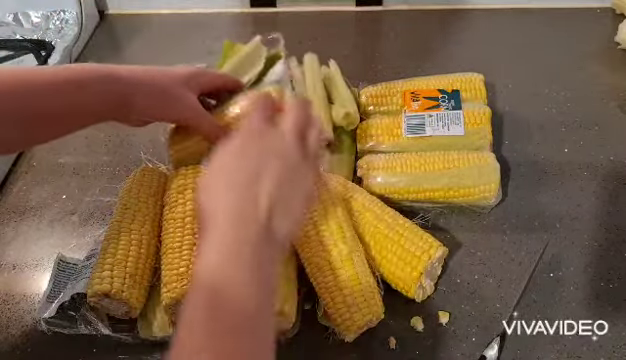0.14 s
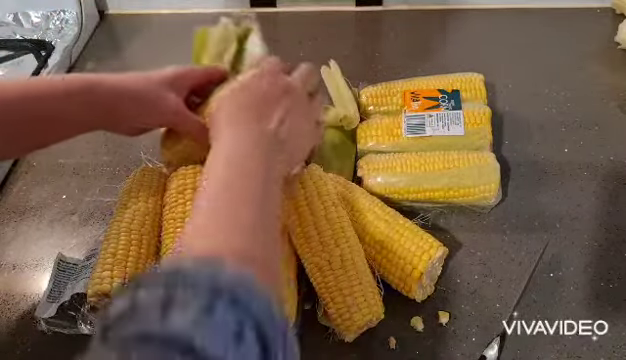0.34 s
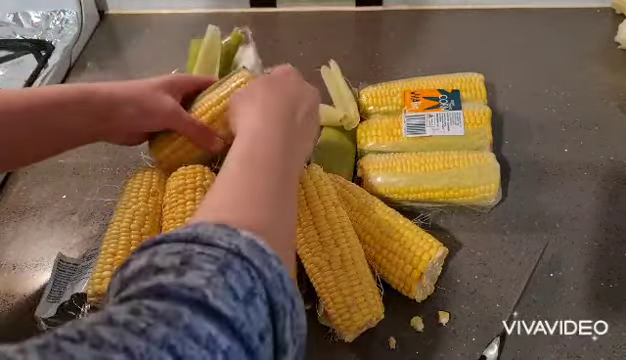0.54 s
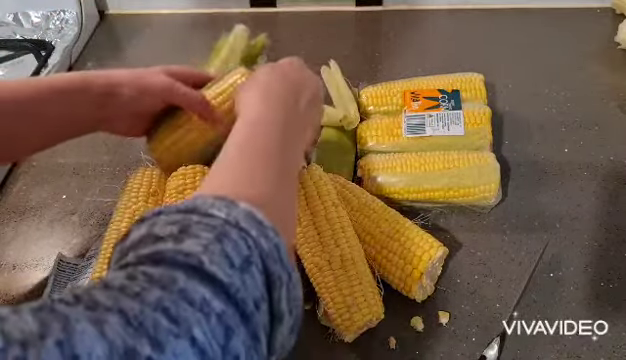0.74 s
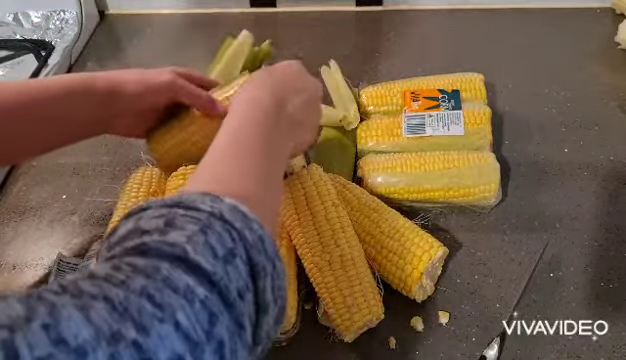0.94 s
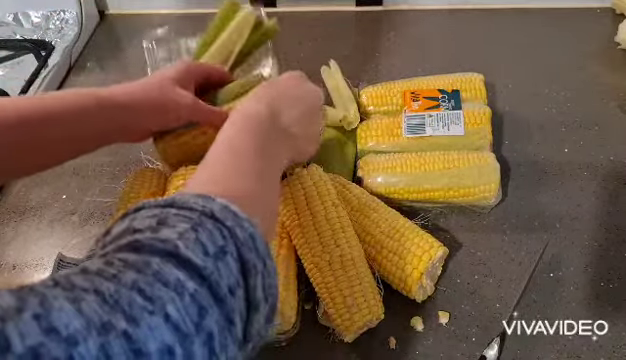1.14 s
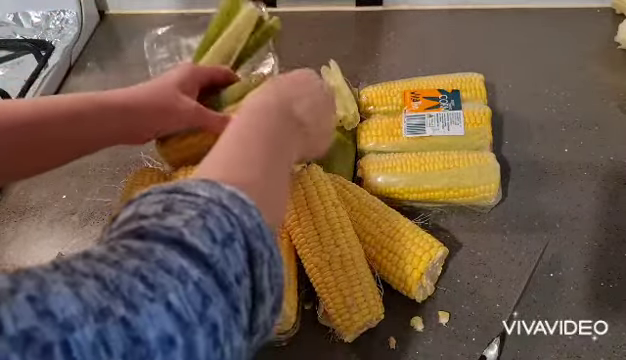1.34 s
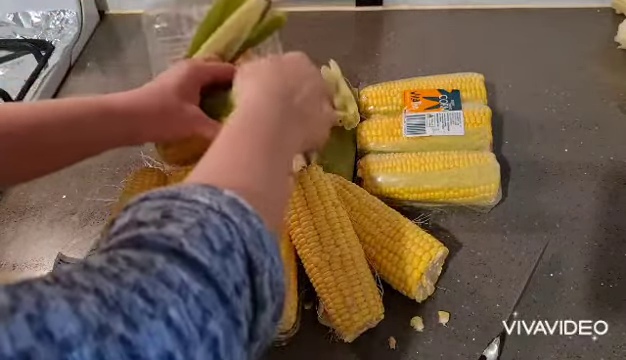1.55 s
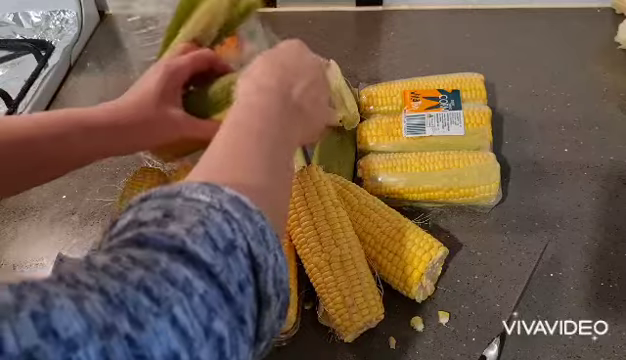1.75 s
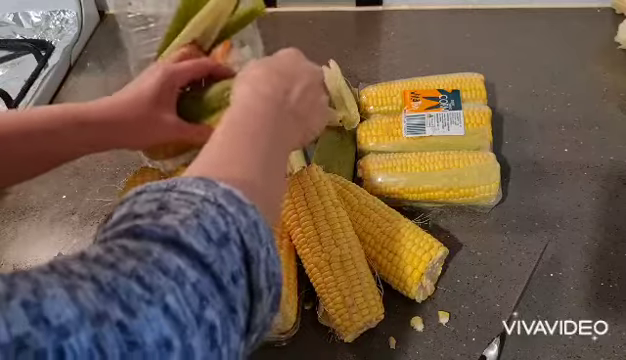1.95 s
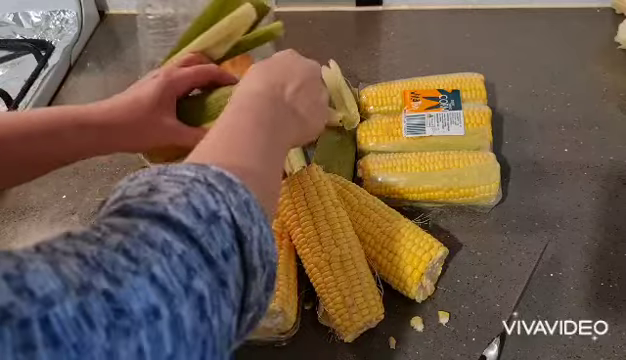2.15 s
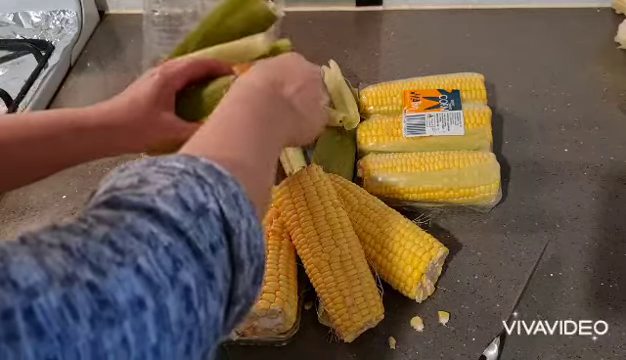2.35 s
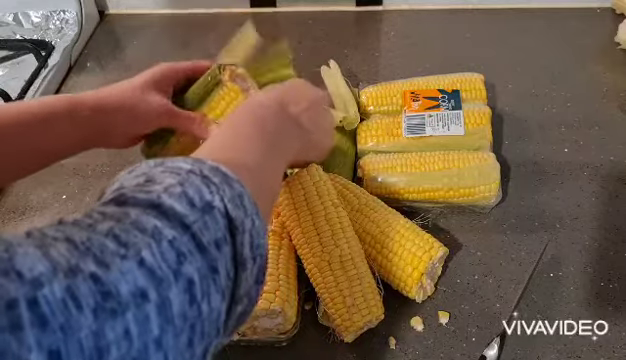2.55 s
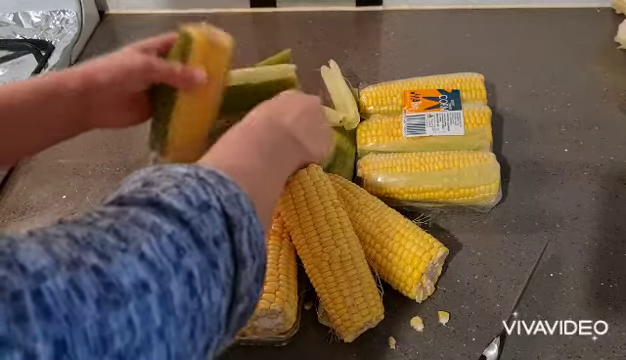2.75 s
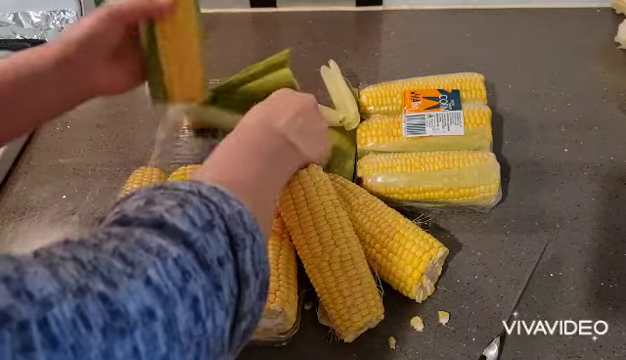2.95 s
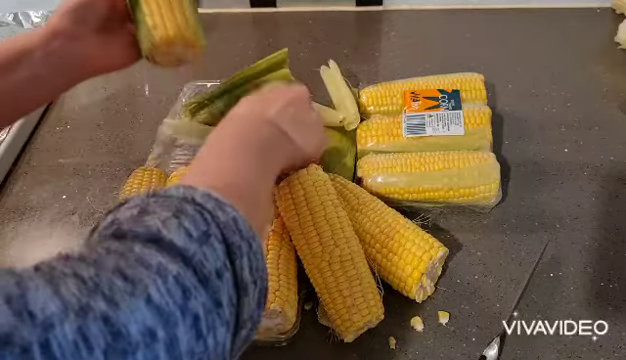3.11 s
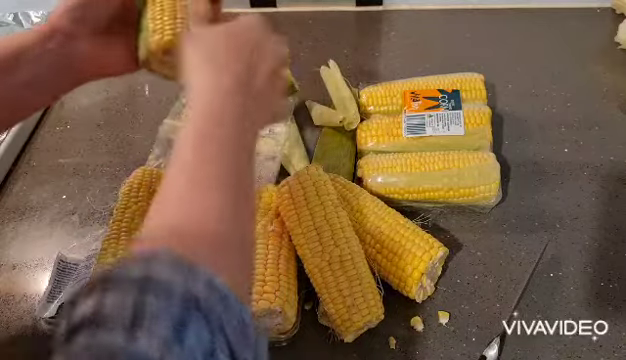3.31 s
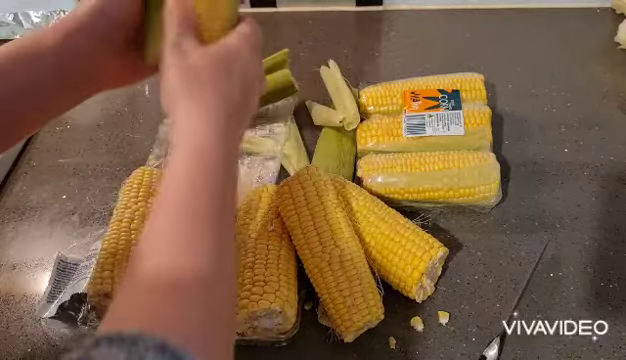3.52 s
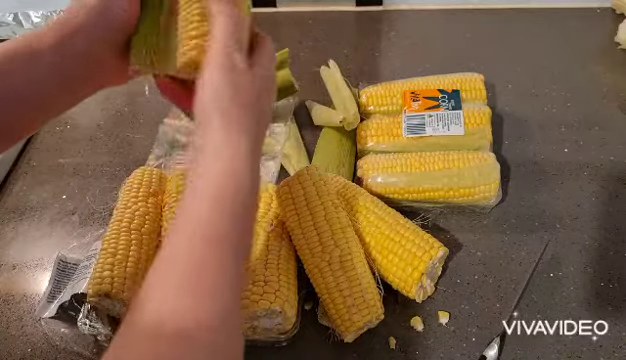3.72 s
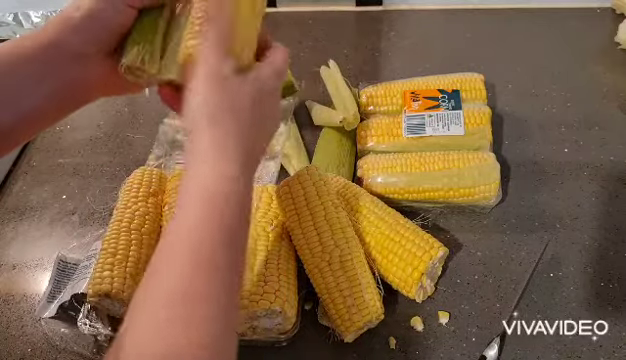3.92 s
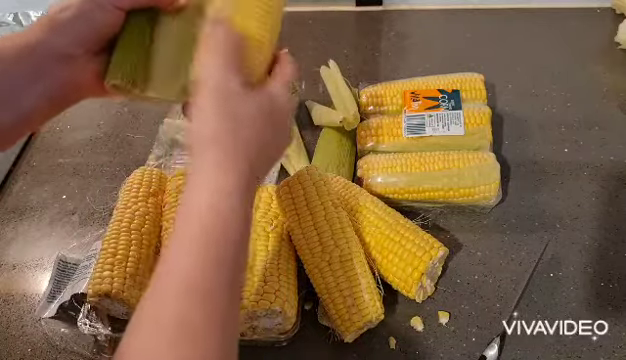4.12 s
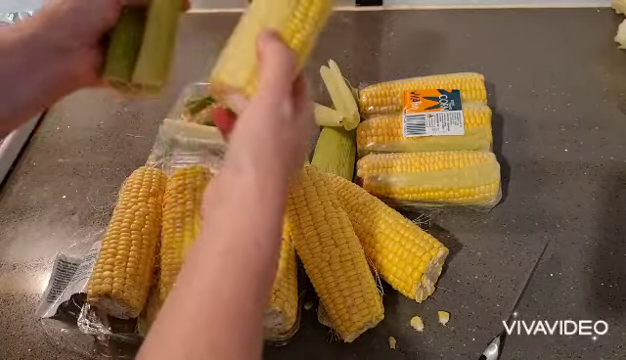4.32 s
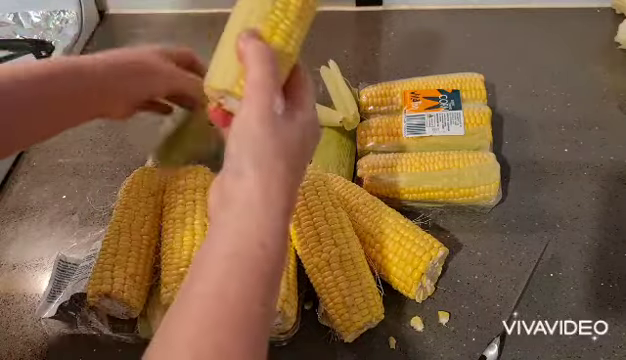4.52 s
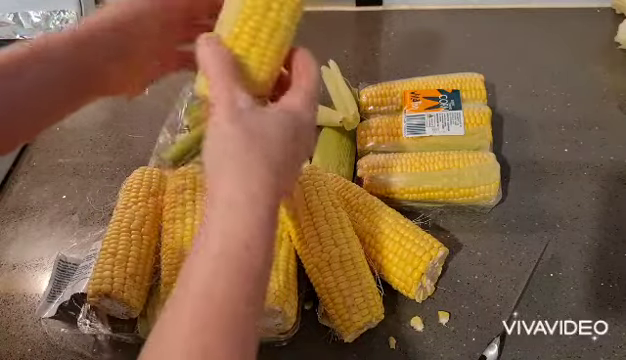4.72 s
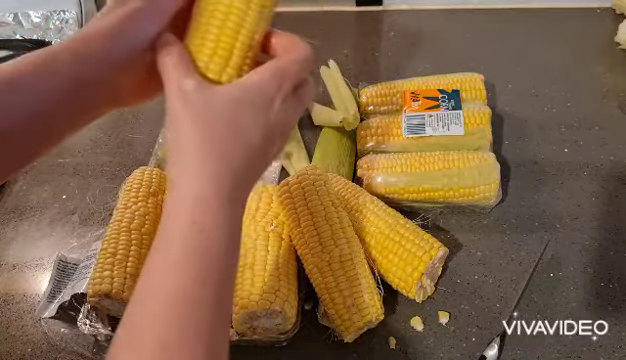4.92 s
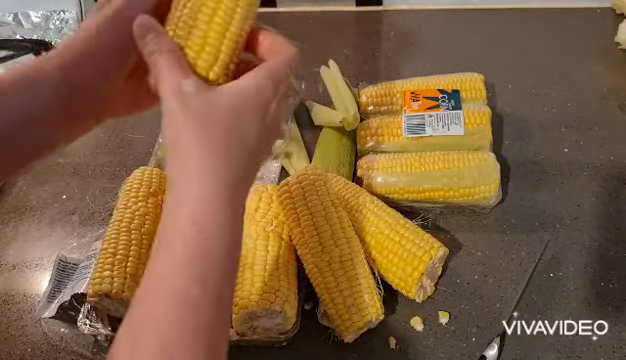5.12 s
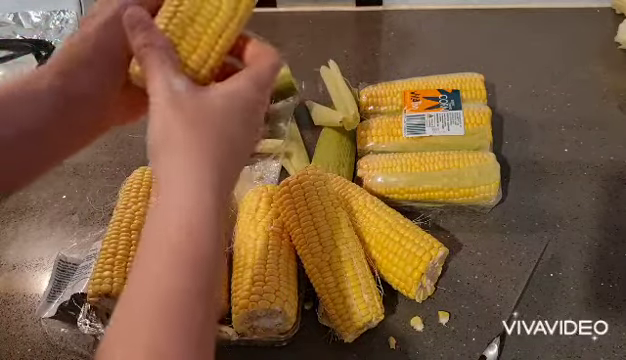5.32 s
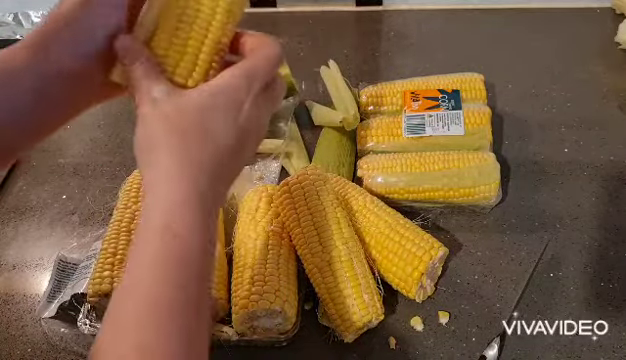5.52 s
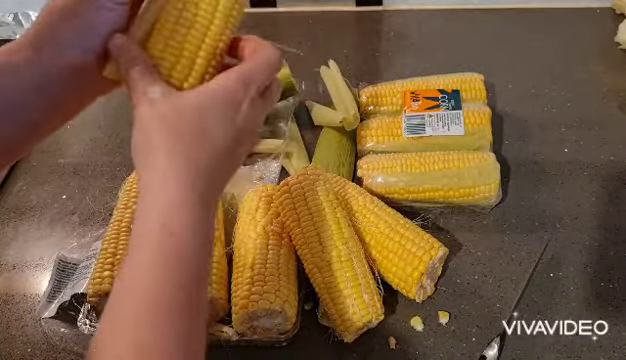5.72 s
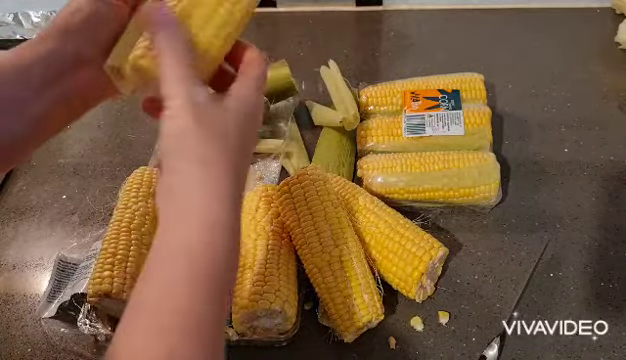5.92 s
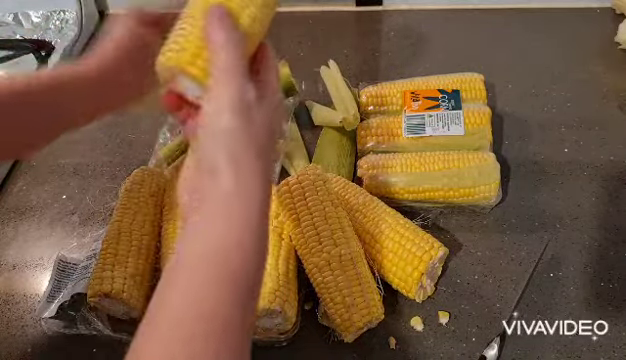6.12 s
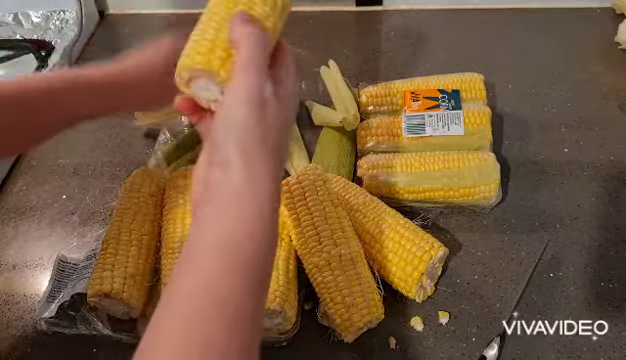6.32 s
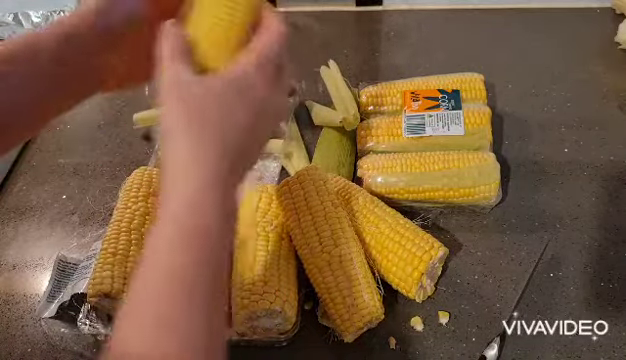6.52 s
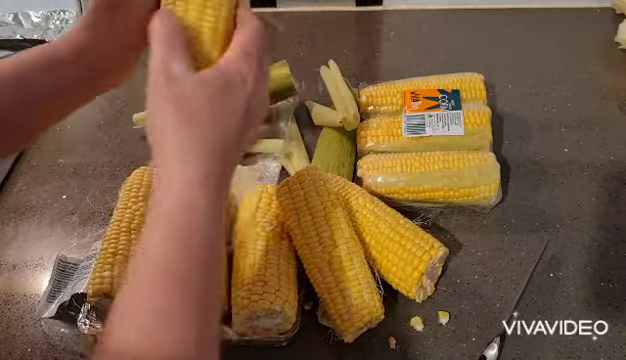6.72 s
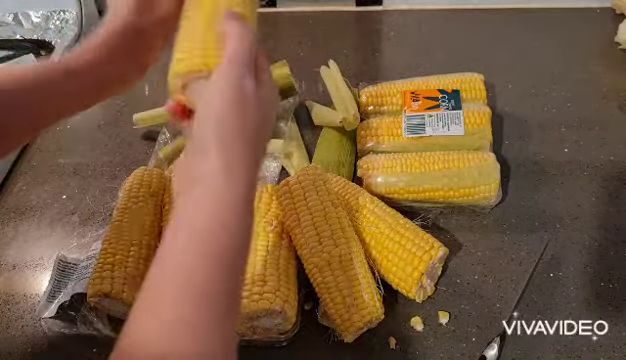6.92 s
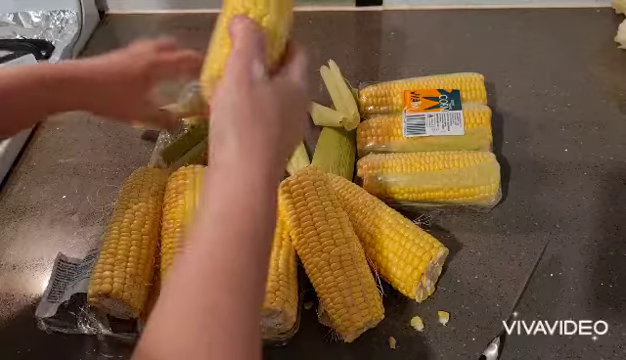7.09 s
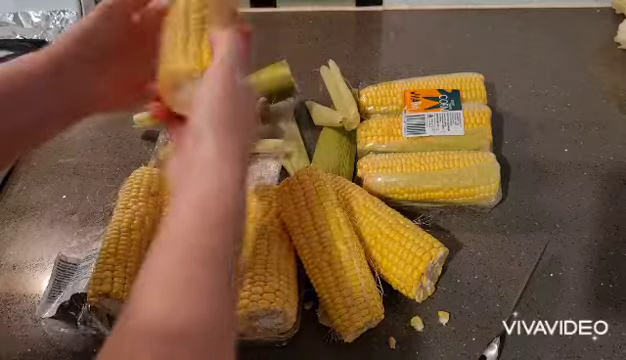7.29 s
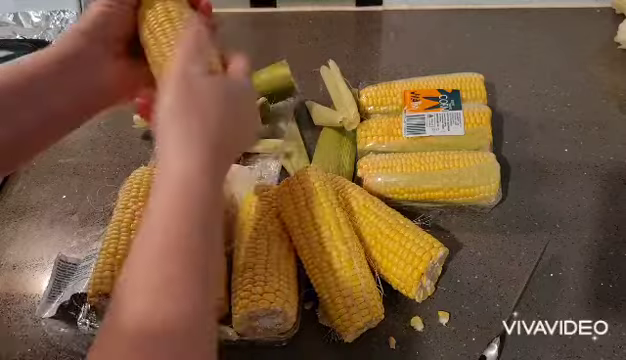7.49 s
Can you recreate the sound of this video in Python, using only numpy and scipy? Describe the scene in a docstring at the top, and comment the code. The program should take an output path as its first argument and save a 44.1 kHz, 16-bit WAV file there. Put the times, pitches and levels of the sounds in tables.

```python
"""Room air, hiss and an appliance's drone come first: shaped noise, with motor noise in two low resonances.
Over them hands strip husk and silk from corn cobs on a kitchen counter, an arm's length away.
Leaves rustle as dense tiny random cracks that swell and fade with pulls, tiny ticks and tails of snaps.
Fibres snap as short noise bursts with a leaf ring and a cob thud; the hard kitchen rings after each."""
import sys
import numpy as np
from scipy import signal
from scipy.fft import rfft, irfft, next_fast_len
from scipy.io import wavfile
from scipy.ndimage import uniform_filter1d

SR = 44100
rng = np.random.default_rng(int(sys.argv[2]) if len(sys.argv) > 2 else 0)


def store_pcm(level_fs):
    """Save levels as 16-bit WAV."""
    pcm = np.round(np.clip(level_fs, -1, 1) * 32767).astype(np.int16)
    wavfile.write(sys.argv[1], SR, np.atleast_2d(pcm).T)


N = 332955
TIME_S = np.arange(N) / SR


def gain(db):
    """Amplitude factor of a level in dB."""
    return 10 ** (np.asarray(db) / 20)


def unit_rms(x):
    """Scales a signal to rms 1."""
    return x / np.sqrt(np.mean(x ** 2))


def bandpass(x, lo_hz, hi_hz):
    """Butterworth band-pass."""
    return signal.sosfilt(signal.butter(2, [lo_hz, hi_hz], "bandpass", fs=SR, output="sos"), x)


def colour(x, table, share=1):
    """Filters by a curve of (hz, db) points, its dB scaled by share."""
    hz, db = np.transpose(table)
    size = next_fast_len(x.shape[-1])
    bin_hz = np.arange(size // 2 + 1) * SR / size + 1  # +1 keeps the log finite
    curve_db = np.interp(np.log(bin_hz), np.log(hz), db)
    return irfft(rfft(x, size) * gain(share * curve_db), size)[..., :x.shape[-1]]


def curves(table):
    """Interpolates table columns over time, one value a sample."""
    time_s, *columns = np.transpose(table)
    return [np.interp(TIME_S, time_s, column) for column in columns]


def smooth_noise(width):
    """Slow random curve of rms 1: noise averaged twice over width samples."""
    noise = rng.standard_normal(N)
    return unit_rms(uniform_filter1d(uniform_filter1d(noise, size=width), size=width))


# spectrum of air and hiss, part common to both channels: hz, relative_density_db
AIR_COMMON = [(150, -33), (200, -9.5), (250, 3), (290, -2.5), (330, 2.5), (410, -13), (640, -9),
              (850, -12.5), (1080, -13), (1400, -30), (2200, -26), (3400, -41), (6500, -25), (9000, -28),
              (14000, -23), (16000, -21)]
# spectrum of air and hiss, part opposite in the channels: hz, relative_density_db
AIR_OPPOSITE = [(18, -77), (30, -30), (157, -16.5), (221, -12), (266, -18), (426, -34), (962, -21.5),
                (1460, -39.5), (4530, -51), (13700, -36.5), (16000, -50.5)]
# spectrum of the low rumble: hz, relative_density_db
RUMBLE_SPECTRUM = [(18, -40.5), (30, -39), (65, -15.5), (156, -9), (179, -8.5), (200, -41.5), (260, -39.5),
                   (440, -120)]


def air(common_db=-58, opposite_db=-58.5, rumble_db=-50.5, waver_db=1.25, whistle_hz=14000, whistle_db=-84.5):
    """Room air and microphone hiss as coloured noise, rumble, and a thin whistle of narrow-band noise."""
    waver = smooth_noise(4000)
    common = gain(common_db + waver_db * waver) * unit_rms(colour(rng.standard_normal(N), AIR_COMMON))
    rumble = gain(rumble_db) * unit_rms(colour(rng.standard_normal(N), RUMBLE_SPECTRUM))
    opposite = gain(opposite_db) * unit_rms(colour(rng.standard_normal(N), AIR_OPPOSITE))
    mid = common + rumble
    whistle_noise = bandpass(rng.standard_normal(N), whistle_hz - 60, whistle_hz + 60)
    whistle = gain(whistle_db) * unit_rms(whistle_noise)
    return np.array([mid + opposite, mid - opposite]) + whistle


# level of the upper hum, a narrow-band noise that flutters at random: time_s, level_db
UPPER_HUM_LEVEL = [(0.0, -77), (0.04, -51.5), (0.46, -41), (0.5, -52.5), (1.81, -45), (1.85, -52.5),
                   (2.44, -42), (2.67, -58), (2.69, -39.5), (2.94, -49), (4.48, -47), (4.73, -56.5),
                   (6.5, -47.5), (6.56, -54), (7.49, -49.5), (7.55, -66)]
# low room resonances, upper then lower: centre_hz, width_hz
HUM_RESONANCES = [(156.5, 23.2), (78.2, 14.7)]


def drone(lower_rel_db=-9, flatten_power=0.17):
    """Motor noise caught in two low resonances, its random flutter partly flattened."""
    out = 0
    (upper_db,) = curves(UPPER_HUM_LEVEL)
    for (hz, width_hz), level_db in zip(HUM_RESONANCES, (upper_db, upper_db + lower_rel_db)):
        narrow = bandpass(rng.standard_normal(next_fast_len(N)), hz - width_hz / 2, hz + width_hz / 2)
        analytic = signal.hilbert(narrow)[:N]
        flattened = analytic.real / np.abs(analytic) ** flatten_power
        out = out + gain(level_db) * unit_rms(bandpass(flattened, hz / 1.42, hz * 2.24))
    return out


# diffuse kitchen tail by band: centre_hz, t60_s, level_db (before echo_db and the counter boost)
KITCHEN_BANDS = [(283, 0.77, -23), (960, 0.31, -19.5), (2374, 0.24, -17.5), (5720, 0.2, -16.5),
                 (12100, 0.082, -15.5)]


def kitchen(x, echo_db, bass_alike_hz=546.0, gap_s=0.0015, counter_db=6, counter_t60_s=0.097):
    """Direct sound, later at the right port, and a 0.25 s noise tail dying by band; each call has own echoes."""
    t = TIME_S[:SR // 4]
    common = rng.standard_normal(len(t))
    own = rng.standard_normal((2, len(t)))
    tail = 0
    for hz, t60_s, level_db in KITCHEN_BANDS:
        alike = 1 / (1 + (hz / bass_alike_hz) ** 2)  # bass is shared by the ports
        noise = np.sqrt(alike) * common + np.sqrt(1 - alike) * own
        ringing = bandpass(noise, hz / 1.81, min(hz * 1.714, .45 * SR))
        tail = tail + gain(level_db - 60 * t / t60_s) * ringing
    counter_boost = 1 + gain(counter_db - 60 * t / counter_t60_s)  # counter and cobs answer first
    response = gain(echo_db) * counter_boost * tail * np.clip(t / gap_s, 0, 1)
    response[0, 0] += 1
    response[1, rng.integers(3, 11)] += 1  # right port lags 3 to 10 samples
    return signal.fftconvolve(x[None], response, axes=1)


# hands turning the cob between swells, levels before rustle shares them among spots:
# time_s, crisp_db, papery_re_crisp_db
HANDLING_LEVEL = [(0, -65, 8), (0.6, -90, -1), (1.0, -100, -5), (1.7, -68, 7), (2.3, -75.5, 6),
                  (3.0, -74.5, 4.5), (3.45, -74, -8), (3.65, -68, 8.5), (4.15, -66.5, 0), (4.42, -74, -7),
                  (4.75, -65.5, 2.5), (5.4, -66.5, -10), (5.75, -67, 2), (6.05, -72.5, -4), (6.6, -82, -4),
                  (6.9, -71.5, -0.5), (7.55, -104, -12)]
# swells of rustle: pulls on a leaf, tiny ticks, and the crackle or tail after a snap;
# same level reference, swell and fade each span 20 dB:
# loudest_s, crisp_db, swell_ms, fade_ms, papery_re_crisp_db, silky_re_crisp_db
RUSTLE_SWELLS = [(0.21, -65.5, 6.2, 84, 10.5, 6.5), (0.262, -59, 9.5, 31, 3, 5),
                 (0.418, -55.5, 53, 52, -3, -7), (0.556, -61.5, 590, 82, 7.5, 4.5),
                 (0.832, -66, 460, 170, 7, 4.5), (1.1, -58, 51, 220, 9.5, 9), (1.212, -48.5, 5, 27, 6, 6),
                 (1.482, -63.5, 38, 103, 10, 3), (1.67, -68.5, 33, 240, 13.5, 11),
                 (1.739, -53.5, 6.1, 11, 12, 15), (2.155, -61, 85, 230, 5.5, 4),
                 (2.329, -61, 45, 29, 14, 8), (2.416, -32, 1.5, 102, 1.5, 2.5),
                 (2.555, -56.5, 240, 52, 13, 6.5), (2.618, -51, 13, 114, 11, 1),
                 (2.717, -52.5, 36, 59, 11, 8.5), (2.786, -60.5, 9.4, 156, 11.5, 9),
                 (3.578, -60, 16, 54, 12.5, 8), (3.859, -61.5, 98, 72, 12.5, 8),
                 (4.24, -50, 53, 90, 1, 0.5), (4.285, -53, 86, 38, 5, 2), (4.616, -61, 55, 67, 13, 3),
                 (4.636, -58.5, 14, 99, 9, 7.5), (5.21, -60, 180, 97, -1.5, 6.5),
                 (5.452, -55, 17, 220, 2, 2), (5.841, -45.5, 22, 13.7, 7.5, 7),
                 (5.946, -54.5, 20, 27, 8, 0), (5.961, -49, 58, 27, 3.5, 5), (6.19, -59.5, 64, 90, 0, 2.5),
                 (6.268, -52.5, 15, 58, 9, 7), (6.305, -61, 20, 130, 6, 1), (7.1, -68.5, 39, 130, -2, -10),
                 (7.331, -73, 32, 99, 10.5, 1)]


def rustle_strength(handling_silk_re_crisp_db=3.5):
    """Crisp, papery and silky strength: swells rise and fade exponentially, their power added to handling."""
    crisp_db, papery_rel_db = curves(HANDLING_LEVEL)
    power = gain([crisp_db, crisp_db + papery_rel_db, crisp_db + handling_silk_re_crisp_db]) ** 2
    for loudest_s, level_db, swell_ms, fade_ms, papery_db, silky_db in RUSTLE_SWELLS:
        late_ms = (TIME_S - loudest_s) * 1000
        drop_db = 20 * np.maximum(late_ms / fade_ms, -late_ms / swell_ms)
        power = power + gain(level_db - drop_db) ** 2 * gain([[0], [papery_db], [silky_db]]) ** 2
    return np.sqrt(power)


def rustle(cracks_per_s=1500., clump_db=2.5, dull_db=-5.0, uneven_db=3.0, largest=0.78, spots=3, echo_db=-8):
    """Dense tiny cracks of uneven size from a few spots, in clumps a few milliseconds long."""
    crisp, papery, silky = rustle_strength()
    clumps = smooth_noise(200)
    out = 0
    for _ in range(spots):
        hit = rng.random(N) < cracks_per_s / SR
        strength = rng.standard_normal(N)
        extra_db = uneven_db * np.minimum(rng.exponential(size=N), largest)
        cracks = hit * strength * gain(extra_db)
        cracks = cracks * gain(clump_db * clumps)  # the leaf gives way in jerks
        crisp_noise = unit_rms(bandpass(cracks, 2450, 6290))
        paper_noise = unit_rms(bandpass(cracks, 706, 3256)) + gain(dull_db) * unit_rms(bandpass(cracks, 260, 938))
        silk_noise = unit_rms(bandpass(cracks, 8570, 15150))
        spot = (crisp * crisp_noise + papery * paper_noise + silky * silk_noise) / spots
        out = out + kitchen(spot, echo_db)[:, :N]
    return out


# modes of a cob against the counter: hz, level_db (before cob_share), t60_s
COB_MODES = [(369.7, -3.5, 0.056), (480, -8.5, 0.099), (589.4, -6, 0.12), (712.5, -13, 0.036),
             (841, -5.5, 0.08), (1140, -22.5, 0.06), (1390, -14, 0.06)]
# snaps and knocks, part levels are peaks before the echo, burst_ms is a decay time constant:
# start_s, crack_db, top_re_crack_db, ring_re_crack_db, thud_re_crack_db, ring_hz,
# papery_re_crack_db, burst_ms, left_minus_right_db, echo_db
SNAP_EVENTS = [(0.2073, -53.5, -1, 7, 17.5, 1430, 10.5, 1.2, 0, -7.5),
               (0.5601, -47, -6, 7.5, 19, 1070, 13, 0.51, 0.5, -10),
               (0.563, -61, -8, 25.5, 18, 399, 0, 1.05, 0, -13),
               (0.585, -63.5, -8, 22, 14, 626, 0, 0.91, 2, -10),
               (0.7241, -50.5, 0, 4, 12.5, 468, 5.5, 1.1, -3, -7.5),
               (0.798, -71, -8, -14, 21.5, 1210, -5.5, 0.65, -0.5, -4),
               (1.0932, -43, 0, 12, -12, 2400, 2, 1.2, -0.5, -19),
               (1.2081, -36, -2, 7, -20, 2500, -6, 0.5, 0, -21),
               (1.236, -65, -8, -10, 18, 900, 0, 1, 1, -12),
               (1.6674, -60, -18, 4, 7, 1840, -11, 1.1, -1, 4.5),
               (1.738, -28.5, -0.5, -6, -8.5, 1920, -10, 1.9, 0, -17),
               (2.2193, -45, -2, -3, 10.5, 1400, -11, 0.73, -3, -7.5),
               (2.3258, -38.5, -12, -5, 13, 1800, -10, 3, -1.5, -10),
               (2.4164, -13, -3, -5, -24, 4600, -6, 0.5, -3, -15),
               (2.4183, -8, -10, -5, -40, 6500, -14, 0.6, -3, -15),
               (2.4508, -47.5, -9, 13, 7, 1550, 23, 2.3, 0, -5),
               (2.494, -45.5, -9, 11, 13, 1210, 15.5, 1.2, 0, -6.5),
               (2.5015, -52, -3, 1, 14, 1390, 5, 1, -2, -11),
               (2.6162, -26.5, -7, 3, -7, 2690, 5, 0.98, -3, -10),
               (2.6186, -27, -15, -6, -20, 1130, 11, 2.2, -1, -19),
               (2.671, -43.5, -13, 3.5, 14.5, 934, 4, 1.1, -2, -10.5),
               (2.7142, -37, 3, 4.5, 16, 718, 3, 2.8, 0.5, -13),
               (2.783, -39, 3, -3, 1.5, 7300, 1.5, 1.9, 0, -13),
               (3.5672, -48, 0, 0.5, -12, 1350, -2, 2.9, 0, -7.5),
               (3.6714, -41, -25, -2.5, -25, 1630, -1, 2.3, 0, -13),
               (3.7759, -41.5, 1.5, -12, -2.5, 3140, 4, 1.5, 2, -12),
               (3.8674, -41.5, 0, 6, -14, 1940, 8, 2.5, 1, -17),
               (4.6108, -41.5, -2, -4, -1, 2210, -2, 3.6, 0, -9),
               (4.631, -34.5, 2, -5.5, -3, 1780, -2, 3.8, 1, -15),
               (5.451, -35.5, -18, -28, -26, 3040, -26, 2.3, 1, -12),
               (5.8266, -41.5, -6, -16, 5, 1280, 0, 1.7, 5, -10.5),
               (5.8391, -26, -16, -36, -8, 2750, -17, 0.69, 1, -16),
               (5.843, -28, -6, -24, -12, 1280, -2, 3.3, 2, -19),
               (5.9487, -34.5, -22, -8, -33, 3400, -3.5, 5.4, 4, -10.5),
               (5.97, -35.5, 0, -17, -28, 3370, -13, 3, -1, -12),
               (6.2633, -34.5, -5, -10.5, -1, 1740, -8, 2.6, 1, -9)]


def snaps(ring_width=1.1, push_ms=1.1, cob_share=0.012, first_break=3.33, detune=0.04):
    """A sharp first break and a burst of lesser ones; the leaf rings near its pitch, the cob thuds."""
    out = np.zeros((2, N + SR))
    t = TIME_S[:8192]
    for start_s, crack_db, top_db, ring_db, thud_db, ring_hz, papery_db, burst_ms, pan_db, echo_db in SNAP_EVENTS:
        chance = rng.standard_normal((3, len(t)))
        breaks = chance[0] * np.sqrt(np.abs(chance[1])) * np.exp(-t * 1000 / burst_ms)
        breaks[0] = first_break
        push = chance[2] * np.exp(-t * 1000 / push_ms)
        push[:int(SR / 2500)] += first_break  # the first contact is a firm short push
        grip = 1 + detune * rng.standard_normal(len(COB_MODES))  # each grip shifts the modes a little
        modes = 0
        for (hz, mode_db, t60_s), shift in zip(COB_MODES, grip):
            modes = modes + gain(mode_db - 60 * t / t60_s) * np.sin(2 * np.pi * hz * shift * t)
        cob = cob_share * signal.fftconvolve(push, modes)[:len(t)]
        parts = [(bandpass(breaks, 3000, 8400), 0),
                 (bandpass(breaks, 10100, 13100), top_db),
                 (bandpass(breaks, ring_hz / ring_width, ring_hz * ring_width), ring_db),
                 (bandpass(push, 180, 1250) + cob, thud_db),
                 (bandpass(breaks, 2200, 5200), papery_db)]
        snap = sum(gain(crack_db + rel_db) * part / np.abs(part).max() for part, rel_db in parts)
        heard = kitchen(snap, echo_db) * gain([[pan_db / 2], [-pan_db / 2]])
        start = int(start_s * SR)
        out[:, start:start + heard.shape[1]] += heard
    return out[:, :N]


def scene():
    """Hands in the kitchen over the drone and the air."""
    return air() + drone() + rustle() + snaps()


# colour contrast of the two ports, scaled by share for each: hz, contrast_db
PORT_CONTRAST = [(60, 3.5), (110, -4.5), (200, -1.5), (380, 1.5), (700, 0), (1290, -0.5), (2380, 0),
                 (4400, 0.0), (8120, -0.5), (15000, 1)]


def record(dry, ceiling=0.9, top_hz=15600):
    """Ports coloured in opposite senses, loudest peaks rounded by tanh, top cut by an elliptic low-pass."""
    left = colour(dry[0], PORT_CONTRAST, share=1.0)
    right = colour(dry[1], PORT_CONTRAST, share=-0.58)
    rounded = ceiling * np.tanh(np.array([left, right]) / ceiling)
    return signal.sosfilt(signal.ellip(10, .2, 80, top_hz, fs=SR, output="sos"), rounded)


dry = scene()
out = record(dry)
store_pcm(out)
```